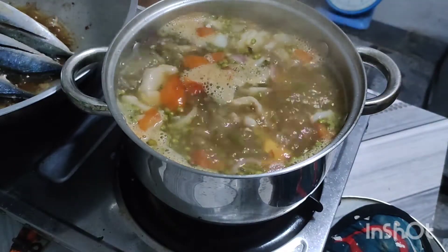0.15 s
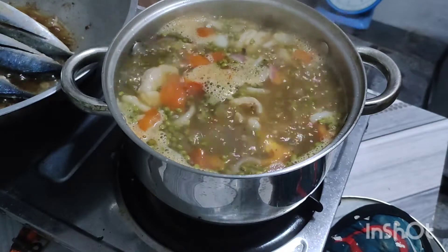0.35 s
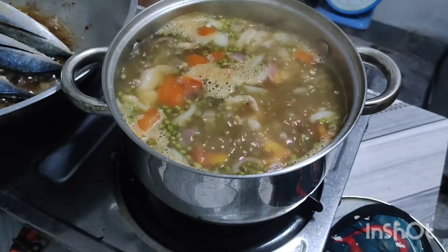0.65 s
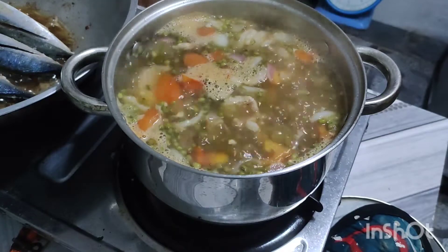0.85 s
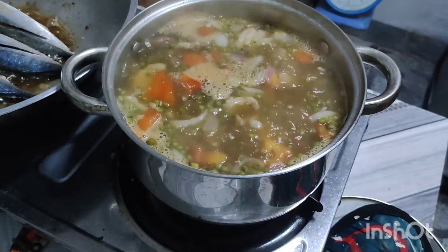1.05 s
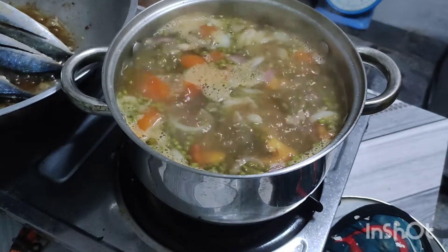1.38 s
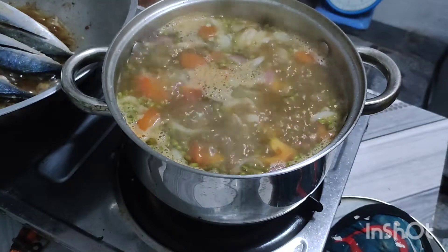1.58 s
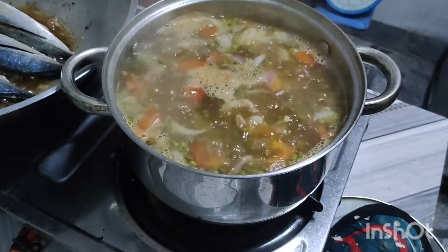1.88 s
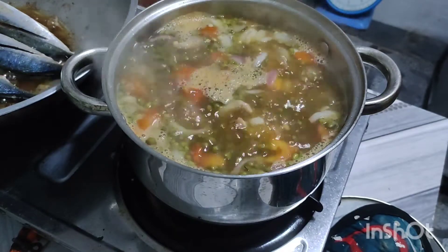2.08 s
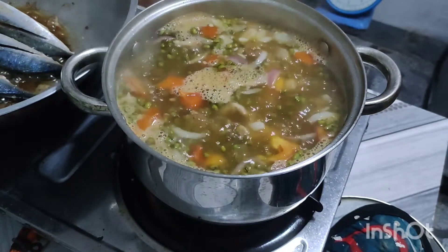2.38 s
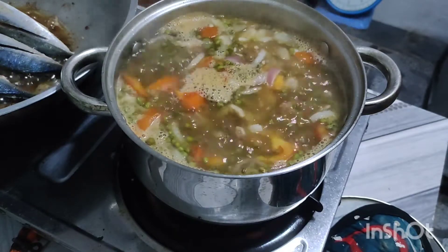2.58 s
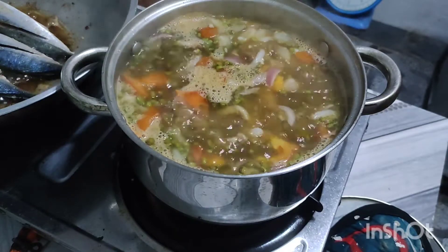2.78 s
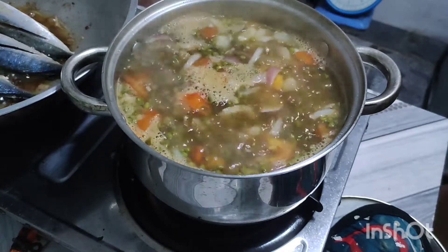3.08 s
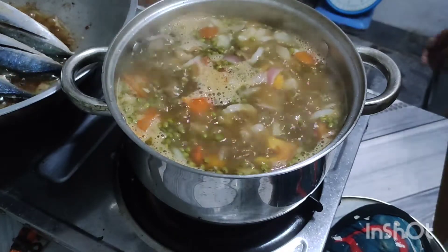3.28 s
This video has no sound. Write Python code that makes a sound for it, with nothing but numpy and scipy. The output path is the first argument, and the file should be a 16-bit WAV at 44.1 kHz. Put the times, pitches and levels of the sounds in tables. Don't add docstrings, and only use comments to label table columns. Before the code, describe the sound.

Soup boils hard in an open steel pot, a bright fizzing hiss with rapid uneven bubble bursts.

```python
import sys
import numpy as np
from scipy import signal
from scipy.fft import rfft, irfft, next_fast_len
from scipy.io import wavfile

SR = 44100
rng = np.random.default_rng(int(sys.argv[2]) if len(sys.argv) > 2 else 0)


def to_linear_factor(level_db):
    exponent = np.asarray(level_db, float) / 20
    return 10 ** exponent


def int16_out(signal):
    q = np.round(np.clip(np.atleast_2d(signal).T, -1, 1) * 32767)
    wavfile.write(sys.argv[1], SR, q.astype(np.int16))


N = 152145
COARSE = 40

# centre in seconds [s], level [dB], colour
# of the burst [Hz], length [s].
BURSTS = [(0.047, -44, 4060, 0.012), (0.149, -18.5, 3700, 0.052), (0.184, -26, 3670, 0.2),
          (0.227, -19.5, 3580, 0.024), (0.276, -26, 3800, 0.023), (0.352, -18.5, 3550, 0.046),
          (0.468, -25, 3940, 0.029), (0.506, -19, 3770, 0.026), (0.558, -23, 3500, 0.034),
          (0.643, -33, 3950, 0.043), (0.673, -28, 4060, 0.012), (0.704, -26, 3680, 0.018),
          (0.77, -18, 3400, 0.027), (0.908, -21, 3650, 0.014), (0.972, -25.5, 3870, 0.063),
          (1.023, -23.5, 3820, 0.02), (1.073, -41, 4090, 0.012), (1.202, -44, 3680, 0.049),
          (1.249, -24.5, 3480, 0.042), (1.323, -25, 3450, 0.11), (1.39, -22.5, 3520, 0.025),
          (1.437, -22.5, 3300, 0.048), (1.522, -19.5, 3630, 0.023), (1.567, -26.5, 4210, 0.033),
          (1.731, -25.5, 3820, 0.058), (1.787, -20, 3570, 0.01), (1.837, -45, 3480, 0.011),
          (1.895, -25, 3580, 0.02),
          (1.944, -25, 3530, 0.037), (1.999, -31, 4060, 0.014), (2.058, -24, 3320, 0.017),
               (2.16, -19.5, 3500, 0.039), (2.249, -22, 3740, 0.015), (2.36, -21.5, 3600, 0.026),
               (2.417, -21, 3670, 0.03), (2.464, -21.5, 3500, 0.035), (2.501, -25, 3670, 0.045),
               (2.559, -23, 3530, 0.052), (2.602, -26, 4230, 0.064), (2.723, -22, 4080, 0.018),
               (2.799, -21.5, 3750, 0.019), (2.837, -23.5, 3920, 0.019), (2.892, -28, 4100, 0.021),
               (2.945, -28, 3650, 0.038), (3.0, -30, 4200, 0.069), (3.131, -21.5, 3670, 0.02),
               (3.155, -26, 3680, 0.0079), (3.215, -42, 3870, 0.015), (3.284, -24, 3700, 0.026),
               (3.335, -23, 3560, 0.029), (3.386, -26.5, 3800, 0.039), (3.44, -21.5, 3980, 0.028)]
# centre in seconds [s], level [dB], pitch [Hz], length [s].
GLUGS = [(0.095, -40, 527, 0.12), (0.206, -37.5, 230, 0.066), (0.351, -35.5, 546, 0.051),
         (0.436, -37, 714, 0.018), (0.628, -40.5, 567, 0.081), (0.77, -40.5, 655, 0.039),
         (1.075, -37, 365, 0.16), (1.133, -39, 530, 0.029), (1.22, -43, 540, 0.028),
         (1.306, -44, 410, 0.031), (1.51, -37.5, 490, 0.018), (1.711, -37, 440, 0.025),
         (1.794, -37, 433, 0.025), (1.848, -35.5, 496, 0.029), (2.099, -39.5, 428, 0.11),
         (2.165, -42, 400, 0.022), (2.217, -38, 230, 0.016), (2.271, -49, 620, 0.017),
         (2.358, -49, 430, 0.04), (2.501, -40, 515, 0.034), (2.547, -36, 420, 0.015),
         (2.605, -40.5, 337, 0.062), (2.717, -39, 490, 0.04), (2.8, -39, 248, 0.032),
         (2.891, -38.5, 350, 0.051), (3.026, -40.5, 257, 0.052), (3.205, -41, 337, 0.064),
         (3.379, -43, 270, 0.023)]
# time in seconds [s], fizz level [dB].
BOIL_VIGOUR = [
    (0.0, -28.5),
    (2.25, -28.5),
    (3.45, -30),
]
# frequency [Hz], density [dB per Hz].
FIZZ_COLOUR = [(700, -35), (1400, -23), (2500, -8), (3700, 0), (5500, -7.5), (9600, -18.5), (11200, -31),
               (15200, -44.5)]
# frequency [Hz], density [dB per Hz].
RUMBLE_COLOUR = [(25, -56), (100, -17.5), (150, -1), (220, 2.5), (500, -1.5), (750, 0), (920, -14),
                 (1500, -5)]
# frequency [Hz], width [Hz], lift [dB].
POT_RESONANCES = [(230, 30, 0), (530, 38, 3), (696, 74, 2), (978, 230, 8.5), (1223, 200, 4.5),
                  (2500, 170, 3.5), (3680, 220, 1.5)]
# frequency [Hz], level difference [dB].
LEFT_BALANCE = [(200, -1), (2600, -3.5), (3400, -9), (6000, -6), (9400, -14), (9800, -7.5), (11200, 4.5),
                (13500, 1.5)]
# frequency [Hz], shared part [0-1].
STEREO_LIKENESS = [(300, 0.4), (900, 0.07), (5650, 0), (5720, 1), (8100, 0.91), (9300, 0), (9900, 1),
                   (10700, 0.23)]
# frequency [Hz], shared part [0-1].
TREBLE_LIKENESS = [(10700, 0), (13300, 0), (14000, 0.3), (15200, 0.2)]
# centre in seconds [s], level [dB], pitch [Hz].
PINGS = [(0.107, -24, 2340), (0.13, -25.1, 3900), (0.177, -18, 3360), (0.187, -20, 3490), (0.36, -22, 3130),
         (0.374, -28, 2368), (0.464, -27, 4182), (0.471, -22.5, 3692), (0.504, -19, 3569),
         (0.509, -25, 2790), (0.546, -23, 3350), (0.554, -26, 3590), (0.562, -25, 2554), (0.646, -25, 3579),
         (0.771, -30, 3840), (0.99, -21, 3800), (1.247, -25, 3730), (1.25, -20, 3570), (1.257, -27, 2384),
         (1.26, -28.3, 2605), (1.268, -19, 3041), (1.337, -26, 2562), (1.434, -27.7, 2901),
         (1.439, -21.5, 3375), (1.551, -26.6, 4850), (1.73, -19, 3790), (1.788, -23.5, 3120),
         (1.788, -28, 4193), (1.896, -20, 3770), (2.063, -27, 5400), (2.158, -23, 3780), (2.158, -20, 3660),
         (2.188, -23, 2860), (2.2, -26, 3960), (2.215, -26.7, 2621), (2.25, -16, 3800), (2.34, -25.5, 5040),
         (2.385, -20, 3666), (2.464, -23, 2650), (2.502, -23, 4190), (2.502, -23, 3570), (2.607, -31, 4900),
         (2.893, -27.5, 4670), (3.003, -24.5, 5710), (3.026, -20.5, 3350), (3.285, -20, 3784),
         (3.385, -22.9, 3816), (3.44, -31, 4400)]
# centre in seconds [s], level [dB], pitch [Hz].
BLOOPS = [(0.025, -43.5, 234), (0.125, -44, 210), (0.21, -40.5, 234), (0.307, -45, 500),
          (0.319, -42.8, 247), (0.342, -50, 732), (0.352, -45.4, 522), (0.402, -44.6, 173),
          (0.434, -48, 730), (0.437, -45.1, 580), (0.474, -45.1, 231), (0.556, -45.5, 990),
          (0.736, -45, 717), (0.768, -46.6, 1055), (0.773, -44.5, 620), (0.953, -47, 1190),
          (0.988, -45.5, 511), (1.028, -45.5, 506), (1.07, -45, 511), (1.078, -46, 204), (1.122, -47, 559),
          (1.142, -43.5, 479), (1.509, -44.5, 505), (1.709, -47, 515), (1.719, -46, 1006),
          (1.719, -45, 274), (1.798, -45.5, 479), (1.848, -47, 403), (1.851, -46, 760), (2.332, -45, 190),
          (2.472, -45.5, 489), (2.696, -47, 409), (2.804, -42.2, 243), (2.883, -43, 228),
          (3.031, -40.9, 223), (3.21, -45, 301), (3.382, -44.9, 230)]
# frequency [Hz], phase [radians].
LEFT_LEAD = [(260, -1.3), (520, 1.5)]


def drift(rate_hz, count):
    r = np.exp(-2 * np.pi * rate_hz * COARSE / SR)
    noise = rng.standard_normal((count, N // COARSE + 502))
    slow = signal.lfilter([1], [1, -2 * r, r * r], noise)[:, 500:]
    fine = np.arange(N) / COARSE
    return np.array([np.interp(fine, np.arange(len(s)), s / s.std()) for s in slow])


def at_hz(points, hz):
    table_hz, value = np.transpose(points)
    return np.interp(np.log(hz), np.log(table_hz), value)


def bubble_swells(rows, share):
    centre_s, db, hz, length_s = np.transpose(rows)
    t = np.arange(N // COARSE + 2)[:, None] * COARSE / SR
    return to_linear_factor(2 * db) * np.exp(-0.5 * ((t - centre_s) / (share * length_s)) ** 2), hz


def swell(power):
    return np.sqrt(np.interp(np.arange(N) / COARSE, np.arange(len(power)), power))


def stereo_bands(x, colour, low_hz, high_hz, count):
    size = next_fast_len(N)
    hz = np.maximum(np.arange(size // 2 + 1) * SR / size, 1)
    own, right = rfft(x, size) * to_linear_factor(at_hz(colour, hz))
    alike = np.clip(at_hz(STEREO_LIKENESS, hz) + at_hz(TREBLE_LIKENESS, hz), 0, 1)
    left = alike * right + np.sqrt(1 - alike ** 2) * own
    pair = np.array([left, right]) / irfft(right, size).std()
    place = np.clip(np.log(hz / low_hz) / np.log(high_hz / low_hz), 0, 1) * (count - 1)
    for k in range(count):
        centre_hz = low_hz * (high_hz / low_hz) ** (k / (count - 1))
        weight = np.clip(1 - abs(place - k), 0, 1)
        yield centre_hz, irfft(pair * weight, size)[:, :N]


def tiny_pops():
    pops_per_s, spread_db = 9000, 2
    size = to_linear_factor(spread_db * np.minimum(rng.exponential(1, (2, N)), 2.5))
    sign = rng.choice([-1, 1], (2, N))
    return size * sign * (rng.random((2, N)) < pops_per_s / SR)


def fizz():
    burst_db, tilt_db, fall_db, middle_hz = -3.5, 46, 5, 3080
    shared_db, patch_db, top_patch_db, side_db = 0.69, 1.47, 1.6, 0.77
    bursts, colour_hz = bubble_swells(BURSTS, share=0.27)
    steady = to_linear_factor(2 * np.interp(np.arange(len(bursts)) * COARSE / SR, *np.transpose(BOIL_VIGOUR)))
    wander = drift(17.1, count=61)
    shared, patch = wander[0], wander[1:].reshape(20, 3, N)
    out = 0
    for k, (hz, band) in enumerate(stereo_bands(tiny_pops(), FIZZ_COLOUR, 804, 14980, count=20)):
        octaves = np.log2(hz / middle_hz)
        tilt = np.clip(tilt_db * octaves * np.log2(colour_hz / 3750), -9, 9)
        lift_db = burst_db + tilt - fall_db * octaves ** 2
        both_db = (patch_db + top_patch_db * (hz > 10500)) * patch[k, 0]
        flutter_db = shared_db * shared + both_db + side_db * patch[k, 1:]
        out = out + band * swell(steady + bursts @ to_linear_factor(2 * lift_db)) * to_linear_factor(flutter_db)
    return to_linear_factor(1) * out


def rumble():
    steady_db, patch_db, glug_db, glug_octaves = -52.5, 2.5, -8.5, 0.65
    glugs, pitch_hz = bubble_swells(GLUGS, share=0.56)
    patch = drift(7.7, count=10)
    noise = rng.standard_normal((2, N))
    colour = RUMBLE_COLOUR + [(3000, -62)]
    out = 0
    for k, (hz, band) in enumerate(stereo_bands(noise, colour, 123.6, 1280, count=10)):
        near = np.exp(-0.5 * (np.log2(hz / pitch_hz) / glug_octaves) ** 2)
        power = to_linear_factor(2 * steady_db) + to_linear_factor(2 * glug_db) * glugs @ near
        out = out + band * swell(power) * to_linear_factor(patch_db * patch[k])
    return out


def pot(x):
    echo_s, echo, echo_return = 512 / 3 / 44100, 0.86, 0.7
    size = next_fast_len(N + 4000)
    hz = np.maximum(np.arange(size // 2 + 1) * SR / size, 1)
    lift_db = sum(db / (1 + (2 * (hz - f) / width) ** 2) for f, width, db in POT_RESONANCES)
    lag = np.exp(-2j * np.pi * hz * echo_s)
    comb = (1 + echo * lag) / (1 + echo_return * lag)
    comb = comb * (1 + echo_return) / (1 + echo)
    port_db = lift_db + at_hz(LEFT_BALANCE, hz) * [[1], [0]]
    return irfft(rfft(x, size) * comb * to_linear_factor(port_db), size)[:, :N]


def ringing_bubbles(s, db, hz, width_s, lead, luck):
    rise_depth = 0.012
    out = np.zeros((2, N + 4000))
    reach = min(int(4 * width_s * 1.5 * SR), 2000)
    t = np.arange(-reach, reach) / SR
    for at, level, pitch, shift, (turn, long, rise) in zip(s, db, hz, lead, luck):
        span_s = width_s * (0.56 + 1.06 * long)
        glide = 1 + rise_depth * (rise - 0.3) * t / span_s
        phase = 2 * np.pi * (pitch * t * glide + turn) + np.array([[shift], [0]])
        gain = to_linear_factor(level + at_hz(LEFT_BALANCE, pitch) * np.array([[1], [0]]))
        start = int(at * SR) + 2000 - reach
        out[:, start:start + 2 * reach] += gain * np.exp(-0.5 * (t / span_s) ** 2) * np.sin(phase)
    return out[:, 2000:N + 2000]


def chirps():
    per_s, level_db, spread_db = 500, -30, 6
    luck = rng.random((int(per_s * N / SR), 7))
    hz = 1500 * 6.0 ** luck[:, 0]
    db = level_db + at_hz(FIZZ_COLOUR, hz) + spread_db * (luck[:, 1] - 0.5)
    lead = 2 * np.pi * luck[:, 2] * (1 - at_hz(STEREO_LIKENESS, hz))
    return ringing_bubbles(luck[:, 3] * (N - 1) / SR, db, hz, 0.0063, lead, luck[:, 4:])


def bloops():
    s, db, hz = np.transpose(BLOOPS)
    return ringing_bubbles(s, db + 0.5, hz, 0.014, at_hz(LEFT_LEAD, hz), rng.random((len(s), 3)))


def pings():
    s, db, hz = np.transpose(PINGS)
    luck = rng.random((len(s), 4))
    return ringing_bubbles(s, db + 0.5, hz, 0.0057, 2 * np.pi * luck[:, 3], luck[:, :3])


def scene():
    return to_linear_factor(2.0) * pot(fizz() + rumble()) + chirps() + bloops() + pings()


def low_pass(x):
    return signal.sosfilt(signal.butter(12, 15250, fs=SR, output="sos"), x)


def record(dry):
    bass_cut = signal.butter(2, 75, "high", fs=SR, output="sos")
    return low_pass(signal.sosfilt(bass_cut, dry))


dry = scene()
out = record(dry)
int16_out(out)
```